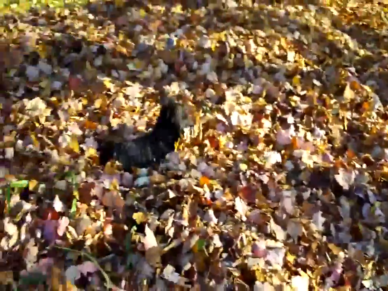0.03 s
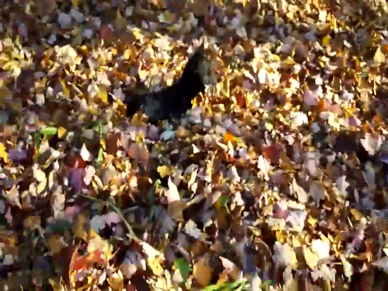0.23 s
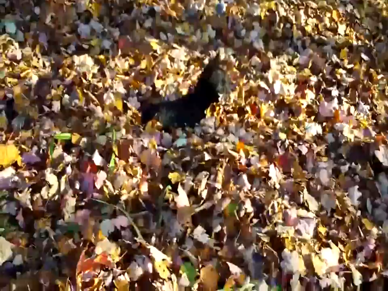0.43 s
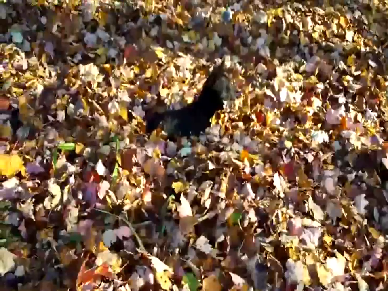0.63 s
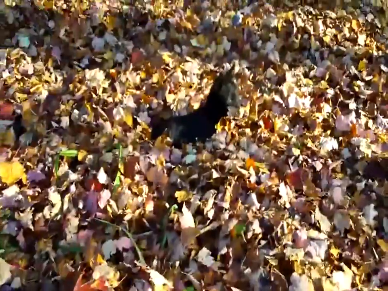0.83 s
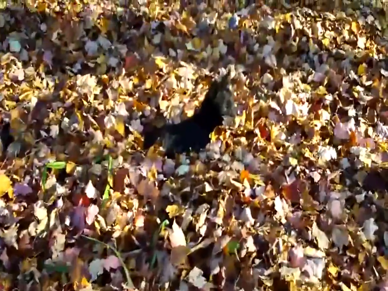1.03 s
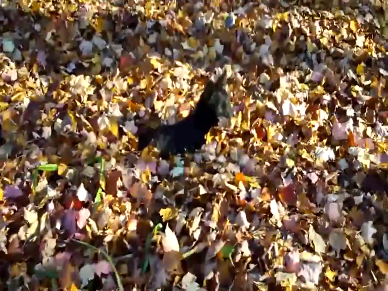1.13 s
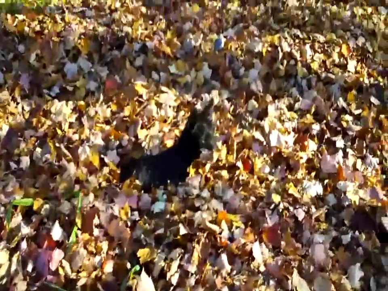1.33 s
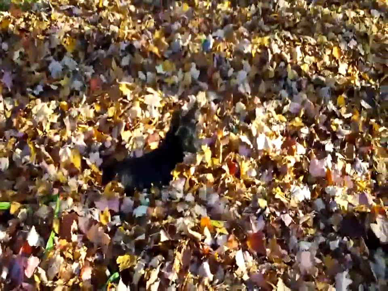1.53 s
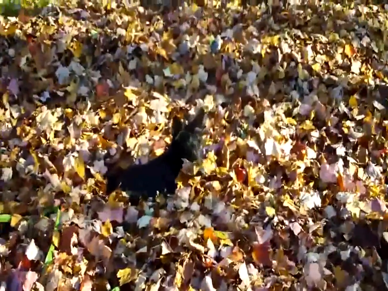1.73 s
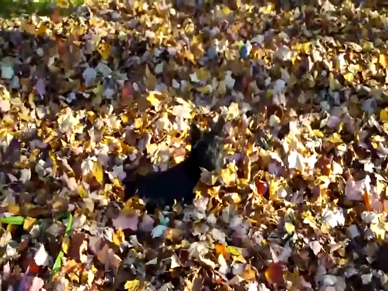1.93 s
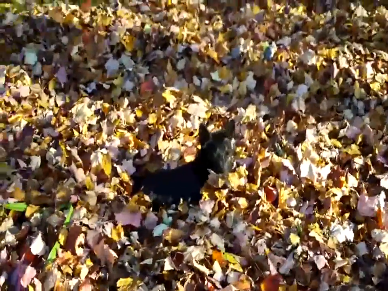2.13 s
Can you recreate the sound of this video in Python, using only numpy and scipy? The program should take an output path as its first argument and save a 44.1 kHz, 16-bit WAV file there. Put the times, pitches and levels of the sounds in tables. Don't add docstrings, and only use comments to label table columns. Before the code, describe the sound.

Two quick squeaky dog barks in a leafy yard, with faint wind and leaf rustle behind.

```python
import sys
import numpy as np
from scipy import signal
from scipy.fft import rfft, irfft
from scipy.io import wavfile
from scipy.ndimage import uniform_filter1d

SR = 44100
rng = np.random.default_rng(int(sys.argv[2]) if len(sys.argv) > 2 else 0)


def elevation(decibels):
    levels = np.asarray(decibels, float)
    return 10 ** (levels / 20)


def file_out(sig):
    cols = np.atleast_2d(sig).T
    lim = np.clip(cols, -1, 1)
    pcm = np.round(lim * 32767).astype(np.int16)
    wavfile.write(sys.argv[1], SR, pcm)


N = 97020

# (time [s], pitch [Hz], level [dB], roughness [0-1])
CHEST = [
    [(.664, 726.3, -44, 0.21), (.68, 735, -35.5, 0.48), (.697, 769.6, -24.5, 0.16),
     (.712, 761.5, -26.5, 0.5), (.72, 807, -18.5, 0.07), (.734, 813.5, -17, 0), (.743, 805, -24.5, 0.04),
     (.749, 845, -40, 0.3), (.762, 794, -70, 0.3)],
    [(1.134, 770, -50, .3), (1.143, 770, -29, .3), (1.149, 778, -16, .2), (1.158, 768, -21, .3),
     (1.165, 756, -21.5, 0.26), (1.176, 762, -28, 0.2), (1.19, 756, -34.5, 0.08), (1.205, 750, -57, 0.25)],
]
# (time [s], pitch [Hz], level [dB])
SQUEAK = [
    [(.698, 600, -44), (.704, 765, -23.5), (.711, 1194, -30), (.717, 1520, -27), (.728, 1640, -44)],
    [(1.104, 933, -45), (1.112, 1032, -33.5), (1.121, 1200, -31), (1.131, 1440, -29), (1.14, 1780, -35),
     (1.148, 2090, -24)],
]
# (time [s], pitch [Hz], level [dB])
RASP = [
    [(.733, 2800, -48), (.74, 2835, -37), (.75, 2920, -36), (.757, 2980, -48)],
    [(1.122, 1128, -44), (1.132, 1184, -36), (1.141, 1375, -30), (1.15, 1490, -32), (1.157, 1450, -21),
     (1.163, 1580, -23), (1.168, 1600, -45)],
]
# (time [s], pitch [Hz], level [dB])
WHISTLE = [
    [(.737, 1414, -51), (.742, 1421, -22), (.754, 1452, -18.5), (.758, 1579, -27.5), (.77, 1774, -24.5),
     (.779, 1662, -28), (.788, 1256, -27.5), (.795, 756, -33.5), (.802, 450, -33.5)],
    [(1.163, 1260, -45), (1.171, 1315, -17), (1.18, 1356, -18), (1.19, 1433, -20), (1.2, 1390, -22),
     (1.21, 1190, -26.5), (1.219, 1093, -37), (1.226, 1020, -45)],
]
# (second [dB], third [dB])
WHISTLE_OVERTONES_DB = (-22, -36)
# (time [s], pitch [Hz], level [dB])
JAW = [
    [(.738, 2400, -45), (.744, 2300, -29), (.752, 2080, -29), (.759, 1880, -35), (.765, 1780, -50)],
    [(1.162, 2150, -45), (1.169, 1970, -30), (1.177, 1720, -30), (1.187, 1680, -42), (1.2, 1640, -50)],
]
# (time [s], pitch [Hz], level [dB])
GRUNT = [
    [(.672, 470, -48), (.682, 482, -37), (.695, 487, -42), (.708, 484, -43), (.718, 475, -47)],
    [(1.222, 760, -37), (1.229, 699, -32), (1.238, 572, -40), (1.25, 535, -39.5), (1.26, 520, -55)],
]
# (second harmonic [dB], third [dB], half-pitch lines [dB], breath [dB])
VOICE_MIX = [
    (-16, -9.5, -21.5, -20.5),
    (-16, -11.5, -18, -19.5),
]
# (centre [Hz], width [Hz], level [dB])
THROAT = [
    [(575, 420, -1), (1440, 180, 9), (2245, 400, 8), (2820, 980, -1), (4500, 190, 5), (4740, 110, -2.5)],
    [(770, 310, -5), (1486, 660, 4), (2160, 510, -2), (2950, 1350, -10), (4320, 155, 5), (4650, 280, -5)],
]
# (time [s], level [dB], low ring [dB], brightness [dB])
POPS = [
    (.682, -22, -1.5, -10),
    (.6952, -13, -8.5, -8),
    (.793, -20, -1, -12),
    (1.227, -28, -7, -16),
]
# (delay [s], level [dB])
ECHOES = [
    (.054, -16),
    (.078, -30),
    (.108, -28),
]
# (time [s], level [dB])
GUST = [(0, -48.5), (.08, -49), (.16, -42.5), (.3, -48.5), (.5, -56.5), (.66, -58.5), (.92, -50.5),
        (.97, -44), (1.03, -47), (1.08, -49.5), (1.3, -56), (1.6, -55.5), (1.85, -49.5), (1.92, -44),
        (2., -43), (2.1, -41.5), (2.15, -42.5), (2.2, -38.5)]
# (frequency [Hz], density [dB per Hz])
LEAVES = [(300, 1), (900, 2), (2000, 4), (3200, 3.5), (4400, 4), (5600, 2)]
# (time [s], peak level [dB])
CRACKS = [(0.393, -34.5), (0.4823, -41), (1.3083, -36), (1.4407, -32), (1.5409, -46), (1.7772, -30),
          (1.8632, -41), (1.9114, -28.5)]
# (frequency [Hz], density [dB per Hz])
AIR = [(90, -28.5), (150, -20), (300, -9), (600, -5.5), (800, -3), (1400, -8), (3000, -20), (5600, -23)]
# (time [s], level [dB])
BUFFET = [(0, -42), (.2, -35.5), (.4, -38), (.52, -34), (.62, -38.5), (1., -37.5), (1.3, -39), (1.7, -39),
          (1.9, -37), (2.2, -43.5)]
# (frequency [Hz], level [dB])
MOTOR = [
    (58, -59),
    (124, -42.5),
    (249, -57.5),
]
# (time [s], offset [full scale])
OFFSET = [(0, .152), (.08, .162), (.15, .145), (.24, .149), (.32, .158), (.66, .145), (.695, .162),
          (.72, .142), (.76, .162), (.805, .144), (.83, .151), (.96, .143), (1.025, .16), (1.1, .143),
          (1.125, .158), (1.146, .147), (1.168, .162), (1.188, .147), (1.21, .158), (1.27, .162),
          (1.36, .152), (1.45, .1425), (2.11, .152)]


def unit(x):
    return x / np.sqrt(np.mean(x ** 2))


def band(x, hz, width):
    return signal.lfilter(*signal.iirpeak(hz, hz / width, fs=SR), x)


def walk(rate):
    hold = int(SR / rate)
    steps = np.repeat(rng.standard_normal(N // hold + 1), hold)
    return 1.306 * uniform_filter1d(uniform_filter1d(steps, hold), hold)[:N]


def curve(table, column=1):
    a = np.array(table, float)
    return np.interp(np.arange(N) / SR, a[:, 0], a[:, column])


def voiced(table):
    t = np.arange(N) / SR
    return elevation(curve(table, column=2)) * np.sqrt(2) * (t > table[0][0]) * (t < table[-1][0])


def turns(hz):
    return 2 * np.pi * np.cumsum(hz) / SR


def colour(x, spectrum, flicker_db):
    a = np.array(spectrum, float)
    f = np.arange(N // 2 + 1) * SR / N + 1
    shaped = rfft(x) * elevation(np.interp(np.log(f), np.log(a[:, 0] + 1), a[:, 1]))
    out = 0
    for octave in np.arange(4, 14.5, .5):
        window = np.clip(1 - 2 * abs(np.log2(f) - octave), 0, 1)
        out = out + irfft(shaped * window, N) * elevation(flicker_db * walk(14.2))
    return unit(out)


def leaf_rustle():
    grains_per_s, spread_db, grain_db = 3000, 2.5, -4
    hits = (rng.random(N) < grains_per_s / SR) * rng.choice([-1, 1], N)
    hits = hits * elevation(spread_db * np.minimum(rng.exponential(size=N), 5))
    bed = colour(rng.standard_normal(N) + elevation(grain_db) * unit(hits), LEAVES, 1.56)
    return bed * elevation(curve(GUST) + 8.5 + walk(24.96))


def leaf_cracks():
    decay_s, trim_db = 0.0093, -8.5
    t, envelope = np.arange(N) / SR, 0
    for s, db in CRACKS:
        envelope = envelope + elevation(db + trim_db) * np.exp(-((t - s) / decay_s) ** 2) * (t > s)
    return envelope * unit(band(rng.standard_normal(N), 3000, 3400))


def distant_air():
    return elevation(-44) * colour(rng.standard_normal(N), AIR, 2.0)


def motor():
    come_in_s = 0.53
    shaft = np.cumsum(1 + 0.01483 * walk(5.98)) / SR
    hum = sum(elevation(db + 2.15 * walk(10.86)) * np.sin(2 * np.pi * hz * shaft) for hz, db in MOTOR)
    return hum * np.interp(np.arange(N) / SR, [come_in_s - .1, come_in_s + 0.075], [elevation(-9.0), 1])


def low_noise(hz):
    width = 1.72 * hz
    return unit(band(band(rng.standard_normal(N), hz, width), hz, width))


def wind():
    rumble = elevation(-49) * low_noise(87.5)
    return rumble + elevation(curve(BUFFET)) * low_noise(28)


def chest_voice(chest, rough, phase, level, second_db, third_db, half_db):
    full_voice_db = -19.5
    pressed = np.minimum(voiced(chest) / elevation(full_voice_db), 1) ** 2
    pressed = pressed * elevation((1 + 14 * rough) * walk(240))
    overtones = elevation(second_db) * np.sin(2 * phase) + elevation(third_db) * np.cos(3 * phase)
    overtones = overtones + elevation(half_db) * (np.sin(1.5 * phase) + np.sin(2.5 * phase))
    return level * (np.sin(phase) + pressed * overtones)


def thin_glide(glide):
    level = voiced(glide) * elevation(4 * walk(300))
    return level * np.sin(turns(curve(glide) * (1 + .035 * walk(350))))


def squeak_voice(squeak):
    phase = turns(curve(squeak) * (1 + .02 * walk(300)))
    level = voiced(squeak) * elevation(1.5 * walk(350))
    return level * (np.sin(phase) + elevation(-19 + 5 * walk(400)) * np.sin(2 * phase)), level


def whistle_voice(phase, level):
    second_db, third_db = WHISTLE_OVERTONES_DB
    return level * (np.sin(phase) + elevation(second_db) * np.cos(2 * phase) + elevation(third_db) * np.sin(3 * phase))


def breath(power, phase, breath_db, throat):
    release_s = 0.029
    effort = abs(uniform_filter1d(power, size=300)) ** 0.4
    fade = np.exp(-1 / (release_s * SR))
    effort = np.maximum(effort, elevation(-5) * signal.lfilter([1 - fade], [1, -fade], effort))
    puff = effort * elevation(1.36 * walk(260)) * (1 + 0.32 * np.sin(phase)) * rng.standard_normal(N)
    rung = sum(elevation(db) * band(band(puff, hz, 2 * w), hz, 2 * w) for hz, w, db in throat)
    return elevation(breath_db + 9.0) * rung


def bark(chest, squeak, whistle, jaw, grunt, rasp, mix, throat):
    second_db, third_db, half_db, breath_db = mix
    rough = np.clip(curve(chest, column=3), 0, 1)
    chest_phase = turns(curve(chest) * (1 + .08 * rough * walk(300)))
    whistle_phase = turns(curve(whistle) * (1 + .005 * walk(250)))
    chest_level = voiced(chest) * elevation(7 * rough * walk(260))
    whistle_level = voiced(whistle) * elevation(.8 * walk(200))
    out = chest_voice(chest, rough, chest_phase, chest_level, second_db, third_db, half_db)
    out = out + whistle_voice(whistle_phase, whistle_level)
    thin, thin_level = squeak_voice(squeak)
    out = out + thin + thin_glide(jaw) + thin_glide(grunt) + thin_glide(rasp)
    power = voiced(chest) ** 2 + whistle_level ** 2 + 5 * (thin_level ** 2 + voiced(rasp) ** 2)
    return out + breath(power, chest_phase, breath_db, throat)


def pops():
    click, thud, tick = np.zeros(N), np.zeros(N), np.zeros(N)
    for s, db, low_db, top_db in POPS:
        i = int(s * SR)
        click[i] = -elevation(db)
        thud[i] = elevation(db + low_db)
        tick[i] = -elevation(db + top_db)
    bright = elevation(17) * band(click, 1500, 900)
    bright = bright + elevation(15) * band(tick, 2600, 900) + elevation(11) * band(tick, 4450, 500)
    return bright + elevation(37.5) * band(click, 742, 160) + elevation(26.5) * band(thud, 354, 670)


def yard(x):
    tail_t60_s, tail_db, scatter_db = 0.4, -24, -15
    treble_db, flutter_db = -9, 1.5
    ring_t60_s, ring_db = .9, -47
    t = np.arange(int(.5 * SR)) / SR
    tail = band(rng.standard_normal(len(t)), 1740, 2500)
    tail = tail * np.exp(-np.log(1000) * t / tail_t60_s) * np.clip(t / 0.021, 0, 1)
    tail = tail / np.sqrt(np.sum(tail ** 2))
    response = elevation(tail_db) * tail
    for s, db in ECHOES:
        response[int(s * SR)] += elevation(db)
    wet = signal.fftconvolve(x, response)[:N]
    scattered = elevation(scatter_db) * signal.fftconvolve(x, tail)[:N]
    low = band(band(wet, 800, 340), 800, 340)
    high = band(wet + scattered, 1400, 1600) * elevation(flutter_db * walk(150))
    corner = band(rng.standard_normal(len(t)), 800, 60)
    corner = corner * np.exp(-np.log(1000) * t / ring_t60_s) * (t > .06)
    ring = signal.fftconvolve(x, corner)[:N]
    return x + low + elevation(treble_db) * high + elevation(ring_db) * ring


def scene():
    yaps = zip(CHEST, SQUEAK, WHISTLE, JAW, GRUNT, RASP, VOICE_MIX, THROAT)
    dog = sum(bark(*parts) for parts in yaps) + pops()
    mono = yard(dog) + leaf_rustle() + leaf_cracks() + distant_air() + motor() + wind()
    return np.array([mono, mono])


def roll_off(x):
    return signal.sosfilt(signal.butter(12, 10890, fs=SR, output="sos"), x)


def record(dry):
    n, steps = np.arange(N), np.array(OFFSET)
    slow = signal.sosfilt(signal.butter(6, 5700, fs=SR, output="sos"), dry[0])
    x = np.interp(n, n[::4], slow[::4])
    x = signal.sosfilt(signal.ellip(8, .2, 70, 10500, fs=SR, output="sos"), x)
    row = np.searchsorted(steps[:, 0], n / SR, side="right") - 1
    offset = uniform_filter1d(steps[row, 1], size=130)
    return roll_off(x + offset * np.array([[1], [-1]]))


dry = scene()
out = record(dry)
file_out(out)
```